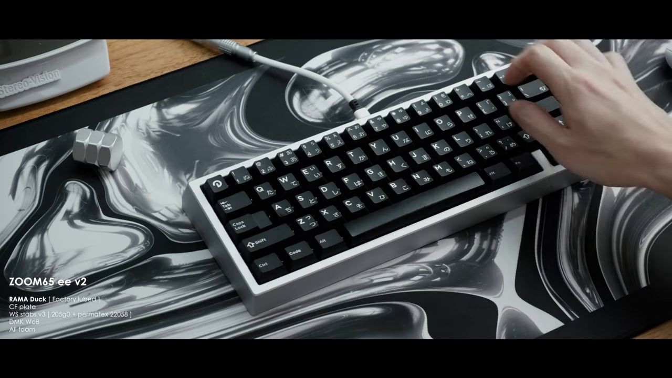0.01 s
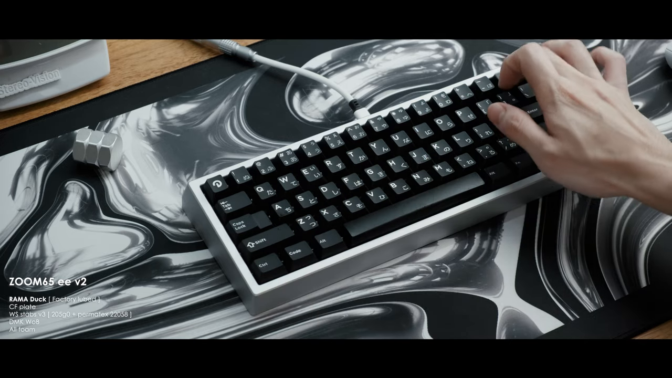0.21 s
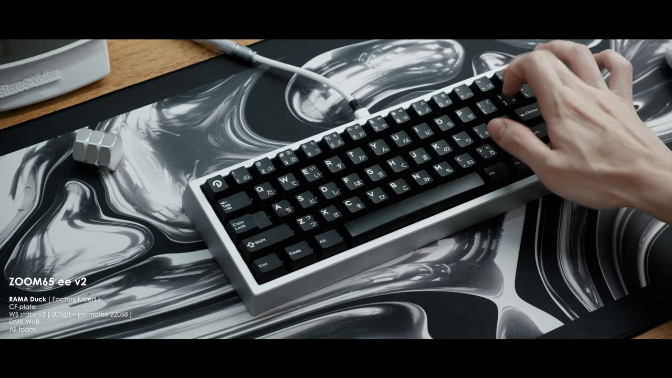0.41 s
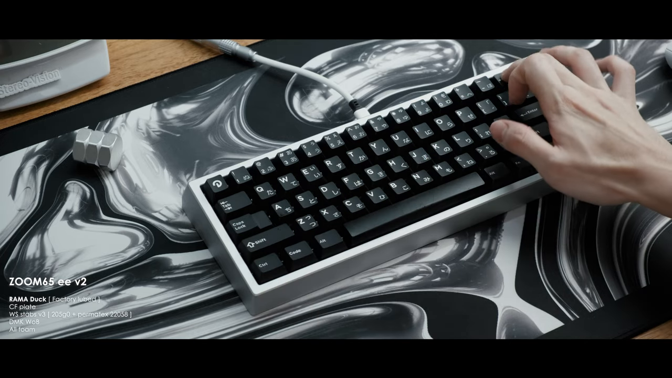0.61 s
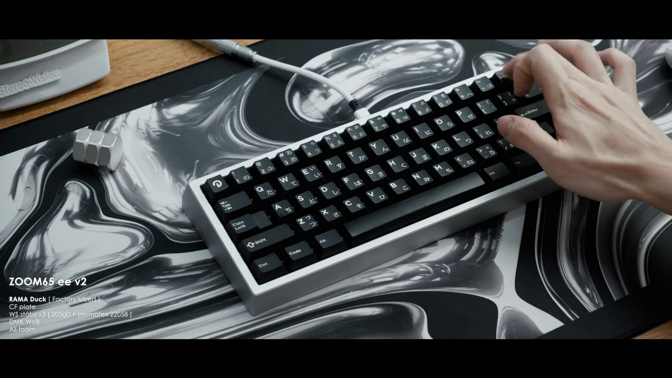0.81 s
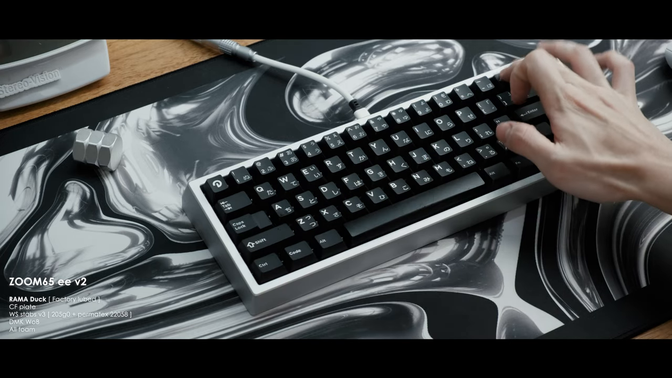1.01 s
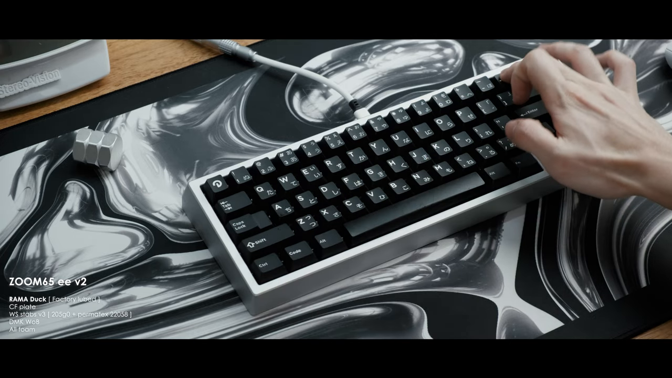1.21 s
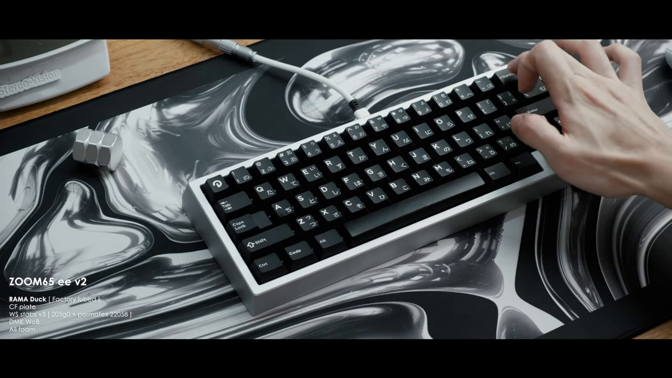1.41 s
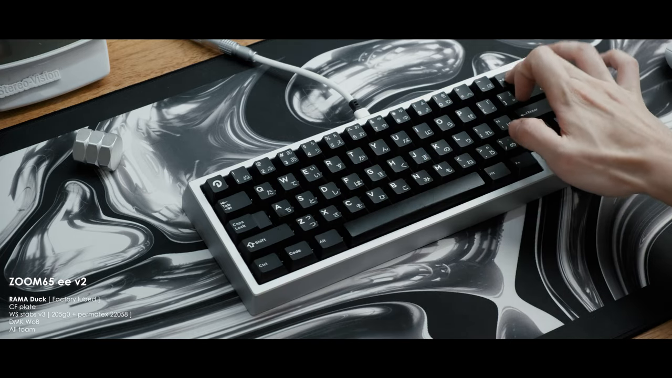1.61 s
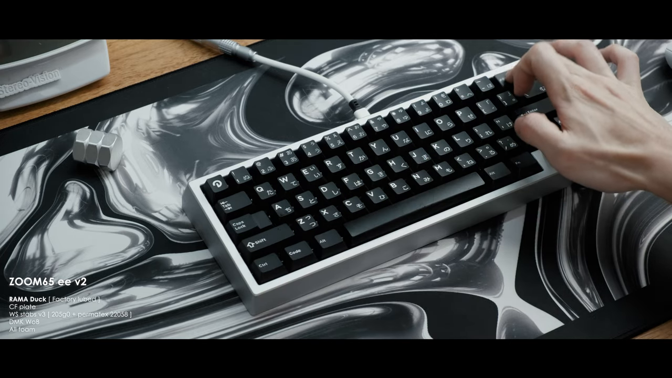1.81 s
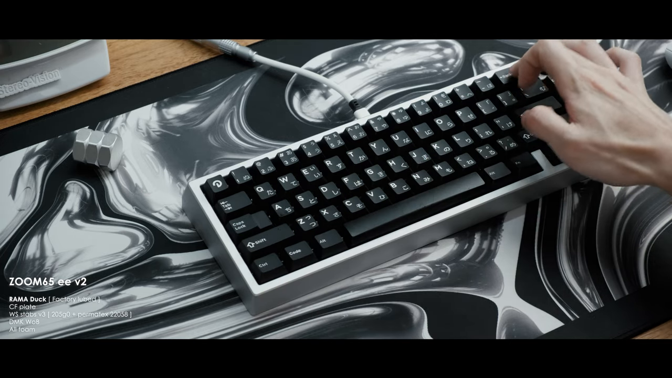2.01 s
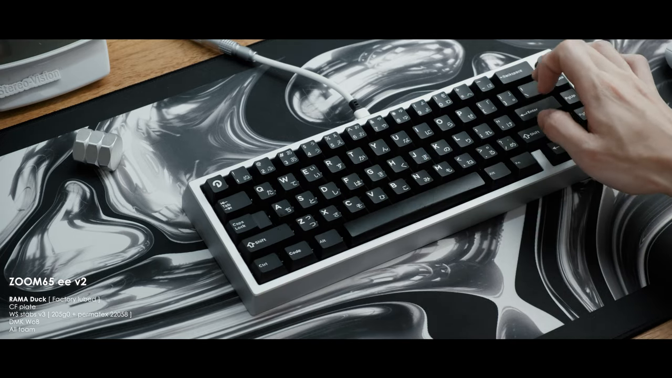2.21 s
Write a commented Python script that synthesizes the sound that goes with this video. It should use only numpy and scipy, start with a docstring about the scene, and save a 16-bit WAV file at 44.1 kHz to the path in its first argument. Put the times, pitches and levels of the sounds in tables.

```python
"""Repeated keystroke on a mechanical keyboard

One finger taps the same key thirteen times, about seven a second, close to the microphone.
A faint noise-burst touch leads each hard clack of the key bottoming out; a softer clack marks its return.
Clacks are decaying modes plus a short noise crack; two high ticks precede the first two presses.
Slower modes thump the desk; decaying noise forms the room's answer, and steady sines over soft noise the fan.
"""
import sys
import numpy as np
from scipy import signal
from scipy.fft import rfft, irfft
from scipy.io import wavfile

SR = 44100
rng = np.random.default_rng(int(sys.argv[2]) if len(sys.argv) > 2 else 0)


def log_audio(samples):
    """Write samples as a 16-bit WAV file to the path given in sys.argv[1]."""
    # one column per channel
    frames = np.atleast_2d(samples).T
    # limit to full scale, then quantise
    limited = np.clip(frames, -1, 1)
    pcm = np.round(limited * 32767).astype(np.int16)
    wavfile.write(sys.argv[1], SR, pcm)


N = 99225

# Steady tones of the fan: pitch_hz, level_db (rms)
FAN_TONES = [(128.5, -70), (192.5, -65.5), (257, -81), (385, -79.5)]
# Relative noise spectrum of the room air: frequency_hz, density_db
AIR_SPECTRUM = [(25, -5), (50, -21.5), (76, -12), (102, -7.5), (130, 5.5), (200, 12.5), (320, 5), (600, -8),
                (1100, -7), (2000, -17), (3200, -22.5), (5500, -39.5), (12000, -34.5), (16000, -44.5)]
AIR_RMS_DB = -64.5

# Colour of the diffuse reverberation: frequency_hz, level_db
ROOM_COLOUR = [(100, 6), (400, 10), (750, 5), (1100, -5), (1500, 4.5), (1800, -9), (2000, 4), (2300, -7.5),
               (3200, -4.5), (4200, -0.5), (5400, -2), (8000, -1.5), (14000, -1)]
# Decay of the diffuse reverberation: frequency_hz, t60_s
ROOM_DECAY = [(100, 0.34), (500, 0.78), (1000, 0.41), (2000, 0.41), (4000, .36), (12000, 0.35)]
# Each response is silent until its onset, then ramps up over an equal time
ROOM_DB, ROOM_ONSET_S = -15.5, 0.0047
EARLY_DB, EARLY_T60_S, EARLY_ONSET_S = -16, 0.027, 0.0018

# Resonances of the desk under the mat: pitch_hz, level_db, t60_s
DESK_MODES = [(78, -72.5, 0.41), (150, -69.5, 0.14), (208, -79.5, 0.031), (290, -65.5, 0.027),
              (420, -66, 0.055), (602, -58.5, 0.082)]
DESK_RISE_S = 0.011  # time constant: the mat cushions the blow

# Radiation of the case on its mat: frequency_hz, gain_db
CASE_RADIATION = [(40, -42.5), (90, -28), (170, -14), (310, -11.5), (420, -3.5), (550, -4.5), (700, -12),
                  (890, 3), (1100, 0.5), (3300, 1), (4400, -4), (5400, -2.5)]
SPREAD_HZ, SPREAD_WIDTH_HZ = 2200, 1400  # band delayed by the plate

# Relative noise spectrum of plastic meeting plastic: frequency_hz, density_db
CRACK_SPECTRUM = [(300, -32.5), (1500, -3), (3200, 5), (4400, 5), (5600, 1.5), (7000, -5.5), (9000, -7.5),
                  (10700, 1.5), (12300, -7.5), (13800, -5), (15000, -19), (16000, -42)]
CRACK_T60_S, CRACK_RISE_S = 0.011, 0.0003  # decay; time constant of the rise
TOUCH_LEAD_S, TOUCH_DB, TOUCH_T60_S = 0.010, -64, 0.03

# Light ticks as the finger lands: start_s, level_db, brightness_db_per_octave, extra_crack_db
TICKS = [(.1966, 9, 8, -1), (.3220, -5, 4, 0)]
# The key springs back to its top stop: start_s, level_db, brightness_db_per_octave, extra_crack_db
RETURNS = [(.2590, -6.5, -2.5, -4.5), (.4012, 1, 2, -3), (.5482, -3.5, 0.5, -1.5), (.6953, -5.5, 0.5, 3),
           (.8364, -1, 2, 0), (.9836, -1.5, 0.5, 2.5), (1.1288, -1.3, 2.5, -2), (1.2739, 0.8, 2, 7.5),
           (1.4253, -0.2, 0.5, 10), (1.5719, -3, 1.5, 2), (1.7208, -4, 1, 1.5), (1.8654, -0.5, 0.5, 4.5),
           (2.0326, -6, -0.5, 4)]
# The key bottoms out: start_s, level_db, brightness_db_per_octave, extra_crack_db
PRESSES = [(0.2052, -5.5, -2, -2), (0.3377, -7, -1, 1.5), (0.4756, -2.5, -1, 0), (.6171, -1, -2.5, -1),
           (0.7631, -1.1, -1, 1), (.9124, -0.3, -1, 1.5), (1.0572, 0.5, 0, 3), (1.2045, -.5, 2, 1.5),
           (1.3553, 0, 3, 0.5), (1.5010, 0, 1, -0.5), (1.649, -3.8, -2, -2), (1.7924, -3, -1, -3.5),
           (1.9479, .5, 3.5, 1.5)]
# Modes of the lightly touched keycap: pitch_hz, level_db, t60_s
TICK_MODES = [(1058, -64.5, 0.022), (2500, -46, 0.02), (3900, -49, 0.008), (5210, -41.5, 0.017),
              (5360, -59, 0.0093), (6340, -68, 0.0088)]
# Modes with the key up: pitch_hz, level_db, t60_s
RETURN_MODES = [(416, -42.5, 0.033), (921, -42.5, 0.019), (1065, -35, 0.017), (1332, -41.5, 0.032),
                (1690, -40, 0.0097), (1864, -34, 0.0079), (2314, -37, 0.015), (2800, -49.5, 0.014),
                (3490, -39.5, 0.0051), (5000, -46, 0.012), (7400, -67, 0.021)]
# Modes of keycap, plate and case with the key down: pitch_hz, level_db, t60_s
PRESS_MODES = [(440, -42.5, 0.042), (944, -41, 0.016), (1404.5, -38, 0.043), (1742, -17.5, .018),
               (2164, -23.5, 0.0092), (2276, -27, 0.016), (2804, -32, .012), (3032, -29.5, 0.0092),
               (3218, -38.5, 0.02), (3890, -40.5, 0.016), (4810, -36.5, 0.01), (5280, -42, 0.028)]
# Base crack levels, before each event's own levels
TICK_CRACK_DB, RETURN_CRACK_DB, PRESS_CRACK_DB = -51, -48.5, -33.5
# The contact time limits the treble of the modes
TICK_SOFT_HZ, RETURN_SOFT_HZ, PRESS_SOFT_HZ = 8850, 5900, 4500
MODE_SCATTER_DB, MODE_DETUNE = 0.6, 0.006  # standard deviations; detune is a fraction of pitch
RING_S = 0.3  # length computed for each event
TOP_HZ = 16000


def undb(db):
    """Decibel law: an amplitude ratio of ten for every 20 dB."""
    return 10 ** (np.asarray(db) / 20)


def at(points, hz):
    """Logarithmic frequency scale: interpolate a table linearly in log frequency."""
    table_hz, values = np.array(points, float).T
    return np.interp(np.log(np.maximum(hz, 1)), np.log(table_hz), values)


def noise(points, size):
    """Spectral shaping: weight white noise by a spectrum, then scale it to rms 1."""
    hz = np.arange(size // 2 + 1) * SR / size
    spectrum = rfft(rng.standard_normal(size)) * undb(at(points, hz))
    x = irfft(spectrum, size)
    return x / x.std()


def fade(t, t60):
    """Exponential damping: amplitude falls 60 dB in t60 seconds."""
    return np.exp(-np.log(1000) * t / t60)


def event_time():
    """Local time: seconds elapsed since an event starts."""
    return np.arange(int(RING_S * SR)) / SR


def add(out, start_s, x):
    """Superposition: mix a sound into out at its starting time."""
    i = int(round(start_s * SR))
    out[i:i + len(x)] += x[:len(out) - i]


def fan():
    """Tonal and broadband sources: steady low sines add to soft air noise."""
    t = np.arange(N) / SR
    out = undb(AIR_RMS_DB) * noise(AIR_SPECTRUM, N)
    for hz, rms_db in FAN_TONES:
        cycles = hz * t + rng.random()
        out = out + np.sqrt(2) * undb(rms_db) * np.sin(2 * np.pi * cycles)
    return out


def delayed_onset(t, onset_s):
    """Propagation delay: silence until the onset, then a linear rise."""
    return np.clip(t / onset_s - 1, 0, 1)


def room(x):
    """Reverberation: convolve with quick desktop scatter and a frequency-dependent diffuse tail."""
    t = np.arange(SR) / SR
    hz = np.arange(SR // 2 + 1.)
    coloured = rfft(rng.standard_normal(SR)) * undb(at(ROOM_COLOUR, hz))
    tail = 0
    for centre_hz in 2. ** np.arange(6, 15):
        # Overlapping triangular octave bands, each with its own decay
        share = np.maximum(0, 1 - abs(np.log2(np.maximum(hz, 1) / centre_hz)))
        band = irfft(coloured * share, SR)
        tail = tail + band * fade(t, at(ROOM_DECAY, centre_hz))
    tail = tail * delayed_onset(t, ROOM_ONSET_S)
    early = rng.standard_normal(SR) * fade(t, EARLY_T60_S) * delayed_onset(t, EARLY_ONSET_S)
    # Unit energy makes the two levels independent of the noise draws
    response = undb(ROOM_DB) * tail / np.linalg.norm(tail)
    response = response + undb(EARLY_DB) * early / np.linalg.norm(early)
    return signal.fftconvolve(x, response)[:N]


def ring(modes, t, bright):
    """Modal superposition: damped sines whose strength and pitch shift a little with each blow."""
    hz, db, t60 = np.array(modes, float).T[:, :, None]
    scatter, detune = rng.standard_normal((2, len(modes), 1))
    # Brightness tilts the modes about the strongest one
    tilt_db = bright * np.log2(hz / hz[np.argmax(db)])
    gain = undb(db + MODE_SCATTER_DB * scatter + tilt_db)
    struck_hz = hz * (1 + MODE_DETUNE * detune)
    return (gain * np.sin(2 * np.pi * struck_hz * t) * fade(t, t60)).sum(0)


def desk():
    """Cushioned impact: each press excites the desk's modes gradually through the mat."""
    out, t = np.zeros(N), event_time()
    rise = 1 - np.exp(-t / DESK_RISE_S)
    for start_s, db, _, _ in PRESSES:
        add(out, start_s, undb(db) * ring(DESK_MODES, t, 0) * rise)
    return out


def radiate(x):
    """Radiation and dispersion: a minimum-phase case response, then an all-pass plate delay."""
    size = 4096
    hz = np.arange(size // 2 + 1) * SR / size
    cepstrum = irfft(np.log(undb(at(CASE_RADIATION, hz))))
    # Folding the cepstrum makes the response causal
    cepstrum[1:size // 2] *= 2
    cepstrum[size // 2 + 1:] = 0
    response = irfft(np.exp(rfft(cepstrum)))
    x = signal.fftconvolve(x, response)[:len(x)]
    _, poles = signal.iirpeak(SPREAD_HZ, SPREAD_HZ / SPREAD_WIDTH_HZ, SR)
    # Reversed coefficients delay the band without changing its level
    return signal.lfilter(poles[::-1], poles, x)


def touches():
    """Friction noise: the fingertip brushes the cap and the stem slides just before each press."""
    out, t = np.zeros(N), event_time()
    for start_s, db, _, _ in PRESSES:
        brush = noise(CRACK_SPECTRUM, len(t)) * fade(t, TOUCH_T60_S)
        add(out, start_s - TOUCH_LEAD_S, undb(db + TOUCH_DB) * radiate(brush))
    return out


def soften(x, hz):
    """Finite contact time: a gentle second-order low-pass limits the treble."""
    return signal.sosfilt(signal.butter(2, hz, fs=SR, output="sos"), x)


def clacks(events, modes, soft_hz, crack_db):
    """Impact excitation: plastic contact rings brief modes under a very short noise crack."""
    out, t = np.zeros(N), event_time()
    snap = fade(t, CRACK_T60_S) * (1 - np.exp(-t / CRACK_RISE_S))
    for start_s, db, bright, extra_db in events:
        body = soften(ring(modes, t, bright), soft_hz)
        crack = undb(crack_db + extra_db) * noise(CRACK_SPECTRUM, len(t)) * snap
        add(out, start_s, undb(db) * radiate(body + crack))
    return out


def scene():
    """Linear superposition: key, desk, room and fan add at one microphone."""
    ticks = clacks(TICKS, TICK_MODES, TICK_SOFT_HZ, TICK_CRACK_DB)
    returns = clacks(RETURNS, RETURN_MODES, RETURN_SOFT_HZ, RETURN_CRACK_DB)
    presses = clacks(PRESSES, PRESS_MODES, PRESS_SOFT_HZ, PRESS_CRACK_DB)
    direct = desk() + touches() + ticks + returns + presses
    return (fan() + room(direct) + direct)[None]


def record(dry):
    """Band limiting: a steep elliptic low-pass removes the extreme treble."""
    return signal.sosfilt(signal.ellip(8, 0.2, 70, TOP_HZ, fs=SR, output="sos"), dry)


dry = scene()
out = record(dry)
log_audio(out)
```